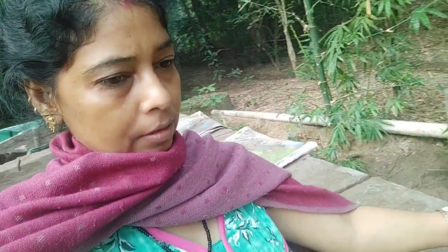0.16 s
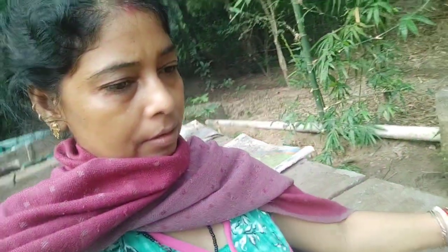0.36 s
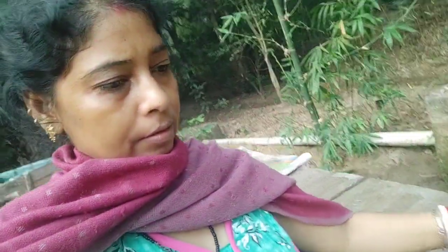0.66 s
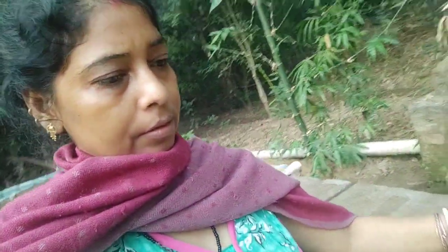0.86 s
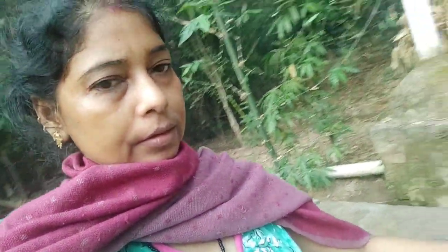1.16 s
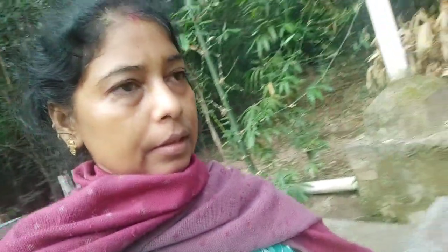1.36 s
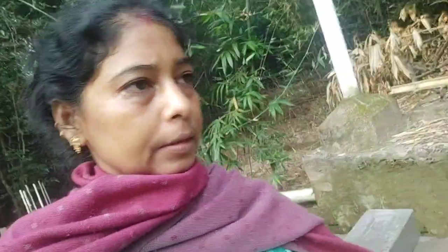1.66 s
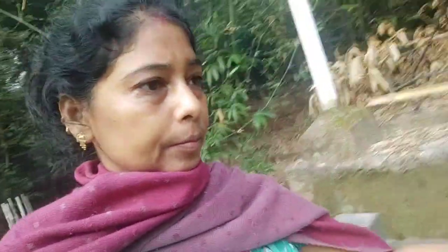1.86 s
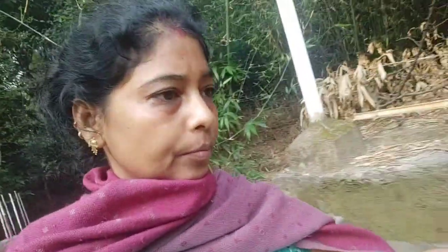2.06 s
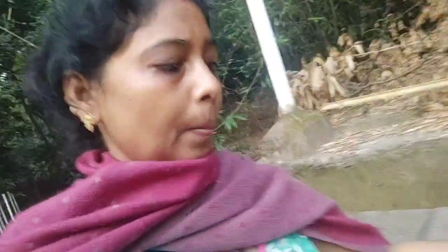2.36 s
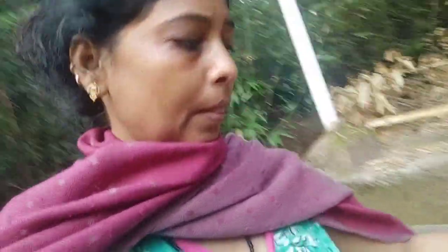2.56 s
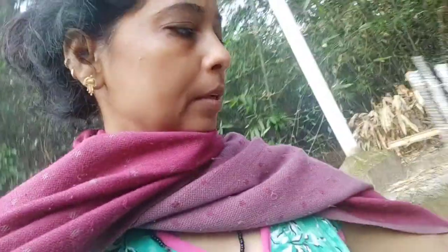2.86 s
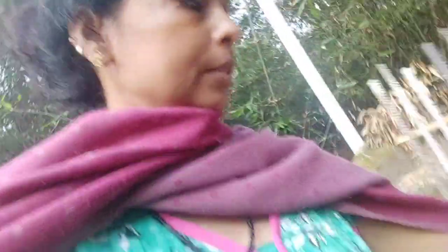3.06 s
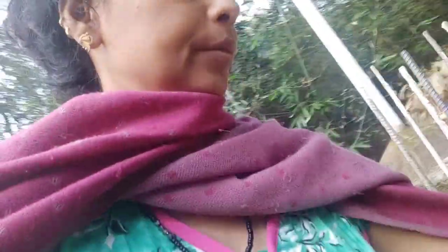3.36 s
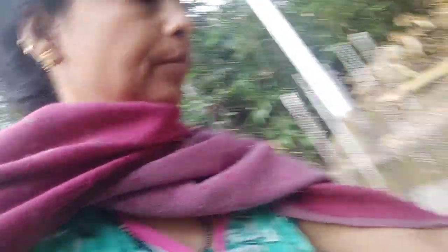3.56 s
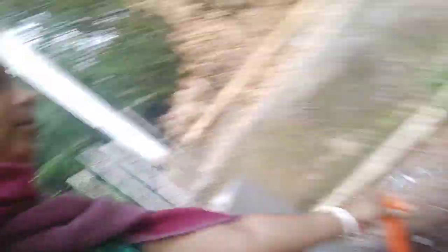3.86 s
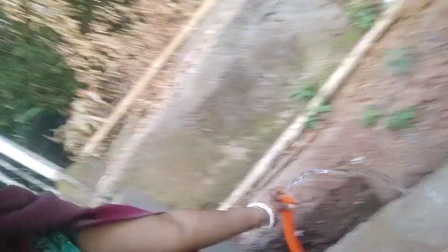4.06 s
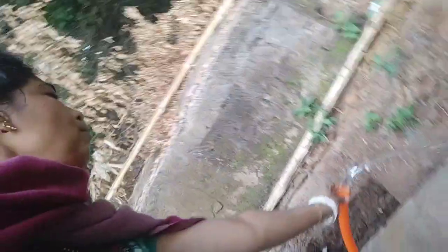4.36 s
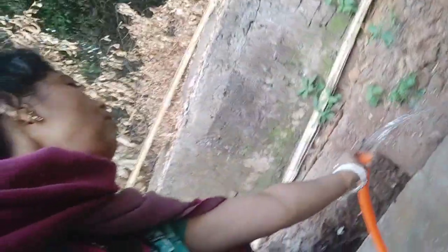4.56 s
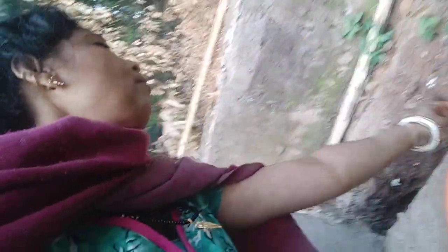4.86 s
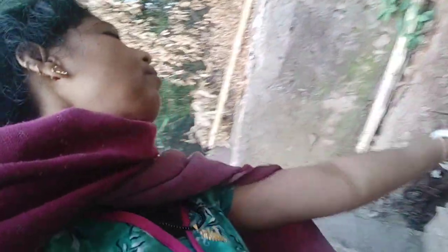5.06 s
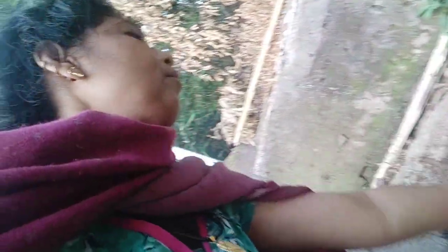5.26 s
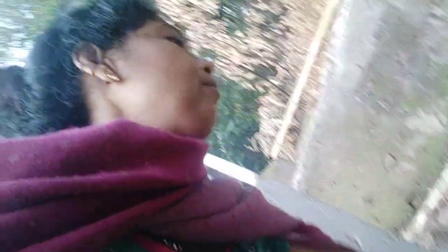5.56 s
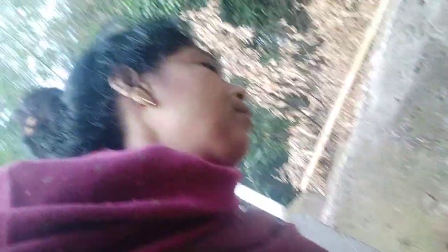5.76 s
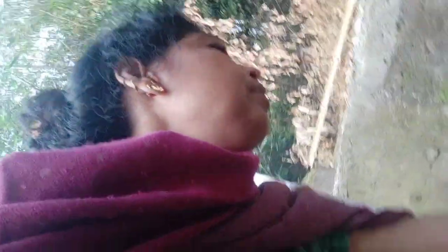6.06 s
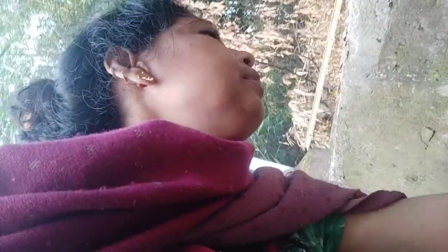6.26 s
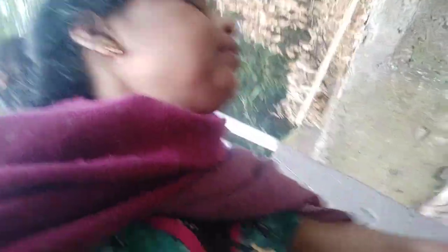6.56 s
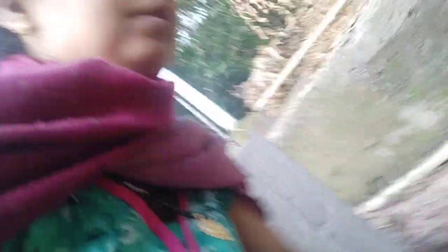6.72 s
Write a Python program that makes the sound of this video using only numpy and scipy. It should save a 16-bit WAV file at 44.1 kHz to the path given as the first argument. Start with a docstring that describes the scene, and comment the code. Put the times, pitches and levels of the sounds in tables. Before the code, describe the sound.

In an open yard, a hand-held hose spatters water close to a swinging phone. From 0 to 1.2 s the water is broken: a short hissing gush at 0.2, smaller spits, scattered plips and a sharp drop at 0.84, with tiny bangle ticks near 0.65 and 1.1. A stronger splash bursts at 1.4-1.6, more follow, and from 2 to 3 s a dense, bright, crackling spray peaks with large popping drops. It dips briefly at 3.1, then resumes as a smoother, fine sizzling hiss. Glass bangles jingle brightly at 4.1-4.3, with one wider clink at 5.3. The hiss weakens from 4.6, swells slightly near 5, and collapses after 5.5 into sparse, lower plops and drips, nearly gone by 6.9. Soft low bumps, distant rumble and faint wavering hum stay underneath; the left is hollower and slightly delayed.

```python
"""Water from a hand-held hose spatters on a wall and the ground in a yard, close to a phone that swings about.
Shaped noise gated by random impacts makes the hiss; decaying, rising sines make the drops' trapped bubbles.
Glass bangles clink on the wrist as damped modes; soft low bumps are brief damped sines.
A far rumble and rush of filtered noise and a faint wavering hum lie underneath.
The right microphone port faces the water; the left one hears it later, through a resonant duct."""
import sys
import numpy as np
from scipy import signal
from scipy.fft import rfft, irfft, next_fast_len
from scipy.io import wavfile
from scipy.ndimage import uniform_filter1d, map_coordinates

SR = 44100
rng = np.random.default_rng(int(sys.argv[2]) if len(sys.argv) > 2 else 0)


def generate_wav(sig):
    """Save sig (samples, or channels by samples) to the path in sys.argv[1] as 16-bit PCM at SR."""
    pcm = np.round(np.clip(np.atleast_2d(sig).T, -1, 1) * 32767).astype(np.int16)
    wavfile.write(sys.argv[1], SR, pcm)


N = 303849


def amp(db):
    """Decibel definition: amplitude ratio from level."""
    return 10 ** (np.asarray(db) / 20)


def unit(x):
    """RMS normalization: equal mean power for any signal."""
    return x / np.sqrt(np.mean(x ** 2) + 1e-20)


def along(points, hz):
    """Logarithmic interpolation: values between (frequency, value) points on a log-frequency axis."""
    f, v = np.transpose(points)
    return np.interp(np.log(hz + 1), np.log(f + 1), v)


def curves(rows):
    """Linear interpolation in time: one curve for each column after start_s."""
    s, *cols = np.transpose(rows)
    return [np.interp(np.arange(N) / SR, s, c) for c in cols]


def wobble(rate):
    """Slow random fluctuation: a spline through normal draws, rate knots a second."""
    knots = rng.standard_normal(int(N * rate / SR) + 4)
    return map_coordinates(knots, [np.arange(N) * rate / SR])


def filtered(x, response):
    """Linear filtering: the spectrum is multiplied by a complex response of frequency."""
    m = next_fast_len(N + 8192)
    return irfft(rfft(x, m) * response(np.fft.rfftfreq(m, 1 / SR)), m)[..., :N]


def add(pair, s, sound, pan_db):
    """Superposition: adds a sound to both channels at time s, with a left-right level difference."""
    at = round(s * SR)
    panned = amp([[pan_db / 2], [-pan_db / 2]]) * sound
    pair[:, at:at + sound.shape[-1]] += panned[:, :N - at]


# wavering hum tones: pitch_hz [Hz], level_db [dB]
HUM_TONES = [(205, -67.5), (310, -73.5)]
# noise spectra of the far rumble and of the rush: frequency_hz [Hz], relative density_db [dB per Hz]
RUMBLE_SPECTRUM = [(15, -0.5), (25, 4), (45, -1), (80, -7.5), (130, -41.5)]
RUSH_SPECTRUM = [(40, -18), (75, 4.5), (110, 0), (300, -4), (460, -7.5), (1000, -15), (2000, -23),
                 (4200, -15), (10000, -25.5), (16000, -16)]
# background level in time: start_s [s], rumble_db [dB], rush_db [dB]
YARD_LEVELS = [(0, -53, -55), (0.301, -51.5, -56.5), (2.65, -52, -52), (3.1, -51, -56), (5.4, -49.5, -57.5),
               (6.89, -50.5, -57.5)]
# correlation of the background at the two ports: frequency_hz [Hz], likeness [-1 to 1]
PORT_LIKENESS = [(30, 0.97), (130, 0.9), (300, 0.84), (640, 0.86), (1200, 0), (3000, 0)]


def yard():
    """Diffuse-field coherence: background noise is alike at both ports when low, unrelated when high."""
    t = np.arange(N) / SR
    out = 0
    for hz, db in HUM_TONES:
        phase = 2 * np.pi * hz * t
        out = out + amp(db + 3.1 * wobble(10)) * np.sin(phase + 0.29 * wobble(11.0))

    def mid_side(hz):
        # this angle makes the correlation of mid + side with mid - side equal the likeness
        angle = np.arccos(np.clip(along(PORT_LIKENESS, hz), -1, 1)) / 2
        return amp(along(spectrum, hz)) * np.array([np.cos(angle), np.sin(angle)])

    for spectrum, db in zip((RUMBLE_SPECTRUM, RUSH_SPECTRUM), curves(YARD_LEVELS)):
        mid, side = filtered(rng.standard_normal((2, N)), mid_side)
        out = out + amp(db + 0.7 * wobble(5)) * unit(np.array([mid + side, mid - side]))
    return out


# changing flow of the stream where it lands, with its longer swells: start_s [s], level_db [dB]
STREAM = [(0, -75), (0.4, -58.5), (1.07, -67), (1.1, -57), (1.25, -47), (1.32, -56), (1.93, -47.5),
          (2.1, -40.5), (2.28, -41.5), (2.52, -44.5), (2.62, -38.5), (3.03, -39.5), (3.1, -51.5),
          (3.26, -41.5), (3.5, -42), (4.66, -48), (4.9, -53), (4.94, -44), (5.43, -46.5), (5.55, -56),
          (5.7, -64.5), (6.3, -59), (6.89, -80)]
# separate gushes slopping out of the hose: start_s [s], length_s [s], level_db [dB]
GUSHES = [(0.188, .2, -39), (0.468, 0.051, -54.5), (0.648, 0.066, -52), (0.771, 0.012, -44.5),
          (0.844, 0.0042, -49.5), (1.018, 0.011, -54), (1.26, 0.01, -43.5), (1.376, 0.21, -32.5),
          (1.635, 0.046, -37.5), (1.688, 0.058, -35), (1.803, 0.025, -43.5), (1.885, 0.009, -39.5),
          (2.454, 0.025, -44), (2.974, 0.041, -34), (5.868, 0.045, -51.5), (6.029, 0.027, -52),
          (6.308, .005, -53.5), (6.36, 0.0069, -51), (6.423, .04, -61.5)]
# a gush swells, thins while it lasts, and breaks off
RISE_DB_PER_S, SAG_DB_PER_S, FALL_DB_PER_S = 800, 73, 552


def landing_db():
    """Power addition of independent sources: spray level of the changing stream plus every gush."""
    t = np.arange(N) / SR
    power = amp(curves(STREAM)[0]) ** 2
    for s, length, db in GUSHES:
        loss_db = RISE_DB_PER_S * np.clip(s - t, 0, None)
        loss_db += SAG_DB_PER_S * np.clip(t - s, 0, length)
        loss_db += FALL_DB_PER_S * np.clip(t - s - length, 0, None)
        power = power + amp(db - np.minimum(loss_db, 200)) ** 2
    return 10 * np.log10(power)


def impacts(per_s, spread_db, life_s):
    """Poisson-like arrivals: drops land at random, rise suddenly and decay; a few are far bigger."""
    lands = rng.random(N) < per_s / SR
    size_db = np.minimum(spread_db * rng.exponential(size=N), 4 * spread_db)
    return unit(signal.lfilter([1], [1, -np.exp(-1 / (life_s * SR))], lands * amp(size_db)))


# the band lifted at the left port has weaker companions higher up:
# multiple of the band centre [ratio], lift_db [dB]
UPPER_BANDS = [(1.52, 2.5), (2.02, 2)]


def patchy(x, centre_hz, lift_db, patchy_db):
    """Time-varying filtering: a wandering band is lifted at each port; random patches swell and sink."""
    hz, _, z = signal.stft(x, SR, nperseg=256)
    hz = hz[:, None] + 1
    centre = np.interp(np.linspace(0, N, z.shape[-1]), np.arange(N), centre_hz)
    lift = np.reshape(lift_db, (-1, 1, 1)) * np.exp(-(np.log(hz / centre) / 0.15) ** 2)
    for times, db in UPPER_BANDS:
        lift[0] += db * np.exp(-(np.log(hz / (times * centre)) / 0.067) ** 2)
    field = uniform_filter1d(rng.standard_normal(z.shape[1:]), size=6, axis=0)  # smooth in frequency
    field = uniform_filter1d(field, size=5, axis=1)  # smooth in time
    return signal.istft(z * amp(lift + patchy_db * unit(field)), SR, nperseg=256)[1][:, :N]


# hiss spectra of three drop sizes: frequency_hz [Hz], relative density_db [dB per Hz]
COARSE_SPECTRUM = [(150, -62), (350, -26), (700, -8.5), (1300, -12.5), (2200, -9), (3200, 3.5), (4500, -22),
                   (8000, -26.5)]
SPRAY_SPECTRUM = [(500, -70), (1500, -37), (3000, -6.5), (5000, 8.5), (8000, 3.5), (10500, -2), (13000, -6),
                  (16000, 5.5)]
MIST_SPECTRUM = [(2500, -70), (6000, -18), (9000, 2), (11500, 1.5), (13500, -2.5), (16500, -4.5)]
# what the water lands on: start_s [s], relative coarse_db [dB], relative mist_db [dB],
# centre_hz of the lifted band [Hz], spatter [0 smooth to 1 single impacts]
SURFACE = [(0, -14, -9.5, 4850, 0.71), (0.9, -8.5, -2.5, 4700, 1), (1.15, -8, -1, 4700, 0.47),
           (1.35, -11, -4.5, 7050, 0.5), (1.95, -11, -3, 6600, 0.33), (2.35, -12, -1.5, 6350, 0.87),
           (2.95, -11, -5, 6700, 0.76), (3.1, -16.5, -1.5, 7440, 0.42), (3.6, -17.5, -3, 7000, 0.13),
           (3.9, -15, -3, 9200, 0.07), (4.3, -15, -3.5, 5800, 0.4), (4.6, -14, -11, 4730, 0.48),
           (5.0, -12.5, -14.5, 5300, 0.06), (5.5, -8, -22, 4800, 0.3), (5.7, 7, -12, 4900, 0.94),
           (6.3, -3, -16, 5030, 1), (6.89, -2, -1, 4800, 0.94)]


def jet():
    """Impact-modulated noise: three drop sizes hiss; spatter turns a smooth rush into single impacts."""
    spray_db = landing_db()
    coarse_db, mist_db, centre_hz, spatter = curves(SURFACE)
    spatter = np.clip(spatter, 0, 1)
    slugs = impacts(280, spread_db=4.5, life_s=0.001)  # the broken stream lands in slugs that hold every size
    surge_db = 0.49 * wobble(30)
    # spectrum, level [dB over spray], share of noise power common to both ports
    layers = [(COARSE_SPECTRUM, coarse_db + 0.41, 0.75),
              (SPRAY_SPECTRUM, -1.5, 0.35),
              (MIST_SPECTRUM, mist_db + 3.5, 0.1)]
    out = np.zeros((2, N))
    for spectrum, db, alike in layers:
        drops = 1.5 * slugs + 0.22 * impacts(400, spread_db=4.5, life_s=0.0016)
        shared, *own = rng.standard_normal((3, N))
        noise = np.sqrt(alike) * shared + np.sqrt(1 - alike) * np.array(own)
        hiss = unit(filtered(noise, lambda hz: amp(along(spectrum, hz))))
        gate = np.sqrt(1 - spatter + spatter * unit(drops) ** 2)
        out += amp(spray_db + db + surge_db + 1.23 * wobble(40)) * gate * hiss
    return patchy(out, centre_hz, lift_db=[5, 3], patchy_db=2.5)


def plips(count):
    """Bubble resonance: small drops ring a cycle or two, lower and louder in coarse, spattering water."""
    spray_db = landing_db()
    coarse_db, _, _, spatter = curves(SURFACE)
    when, size = rng.random(count), rng.exponential(size=count)
    length = 300  # samples
    at = (when * (N - length)).astype(int)
    hz = 2600 * amp(-0.45 * coarse_db[at] + 3.4 * rng.standard_normal(count))
    hz = np.clip(hz, 900, 13000)[:, None]
    t = np.arange(length) / SR
    ring = np.sin(2 * np.pi * hz * t * (1 + 15 * t)) * np.exp(-t * hz / 2.5)  # rising pitch
    level_db = spray_db[at] + 0.84 * coarse_db[at] + 4.0 + 2.77 * size
    ring *= (np.clip(spatter[at], 0, 1) * amp(level_db))[:, None]
    out = np.bincount((at[:, None] + np.arange(length)).ravel(), ring.ravel(), N)
    return filtered(out, lambda f: (1j * f / (600 + 1j * f)) ** 2)  # low cut


# the biggest drops: start_s [s], relative level_db [dB], starting pitch_hz [Hz], relative fizz_db [dB]
BIG_DROPS = [(0.034, -27, 4670, -10), (0.237, -23, 4400, -7), (0.3448, -25.5, 7370, -2),
             (0.388, -15.5, 5130, -33), (0.4264, -20.5, 12800, -7.5), (0.4566, -25.5, 4600, -5),
             (0.512, -31, 5200, -19), (0.588, -29, 8000, -4), (0.7128, -28.5, 5900, -6),
             (0.7895, -28, 8700, -14), (0.8439, -9.5, 4760, -10.5), (0.853, -24, 7800, -7),
             (0.9026, -37, 2400, 1), (0.9335, -35, 10300, 4), (0.9817, -33, 8790, -2),
             (1.0257, -24.5, 7400, -18), (1.2647, -18, 3080, -1), (1.3433, -25, 8350, 7),
             (1.3498, -18.5, 7050, 1), (1.3836, -24, 11840, -1), (1.4697, -28, 7670, 4),
             (1.478, -16.5, 8950, 4), (1.539, -24, 10380, 5), (1.778, -22, 11800, 0),
             (1.809, -12.5, 7060, -3), (1.8924, -18, 8900, 6.5), (2.1027, -24, 6720, 15),
             (2.134, -23, 3540, 10), (2.1515, -13.5, 2630, -1), (2.1654, -14.5, 2700, -13),
             (2.1745, -14, 12020, 2), (2.2051, -20, 8200, 4), (2.2184, -18, 2590, 5.5),
             (2.2276, -25, 2500, 7), (2.363, -7, 5050, -6.5), (2.5403, -14.5, 8830, -1.5),
             (2.587, -8.5, 3710, -2), (2.591, -12, 4230, -3), (2.613, -26.5, 4260, 3),
             (2.6807, 4.5, 11000, -19.5), (2.736, -14.5, 6860, -7), (2.7674, -18.5, 3580, 8),
             (2.832, -8, 7040, -5), (2.8501, -13, 2940, -1), (2.8687, -4.5, 9750, -10),
             (2.8786, -17, 2680, 1), (2.897, -8, 9700, -1.5), (2.9318, -6.5, 7340, -8),
             (2.9555, -8, 7100, -14), (2.962, -10, 10100, 2), (2.9964, -20.5, 5400, 8),
             (3.0008, -13, 7620, -1), (3.261, -10.5, 8790, -9), (3.3114, -13.5, 6300, -9),
             (3.345, -9.5, 7900, -19), (3.5518, -16, 10400, 5.5), (3.8754, -19.5, 11200, 1.5),
             (5.3782, -21.5, 10400, 3), (5.4435, -11, 4950, -15), (5.6643, -22.5, 4900, -10),
             (5.732, -33, 1840, -13), (5.8197, -33.5, 2250, -14), (5.8677, -29, 3100, -14),
             (5.8894, -31, 2600, -12), (5.9067, -32, 1790, -16), (5.972, -38, 1800, -6),
             (6.0091, -37, 2110, -16), (6.0341, -14, 4920, -17), (6.0388, -23, 4140, -14),
             (6.081, -42, 2500, -4), (6.0972, -36, 2180, 4), (6.138, -28, 10980, -9),
             (6.1662, -24, 1810, -10.5), (6.1876, -31, 2400, -9), (6.274, -31.5, 4740, -22),
             (6.3158, -34, 2400, 6), (6.3327, -33, 3200, -15), (6.3556, -36, 3920, -20),
             (6.3655, -23, 3100, -4)]


def splats():
    """Bubble resonance and sheet breakup: a big drop rings a few cycles, slaps, and throws off a fizz."""
    out, t = np.zeros((2, N)), np.arange(SR // 60) / SR
    for s, db, hz, fizz_db in BIG_DROPS:
        shared, left, right, lean = rng.standard_normal((4, len(t)))
        noise = 0.33 * shared + 0.46 * np.array([left, right])
        # the trapped bubble rises in pitch
        ring = 0.82 * np.sin(2 * np.pi * hz * t * (1 + 15 * t)) * np.exp(-t * hz / 4.8)
        ring *= 1 - np.exp(-t / 0.0000667)
        spread = (1 - np.exp(-t / 0.00071)) * np.exp(-t / 0.0014)  # the sheet of water spreads, then settles
        slap = 0.24 * noise
        fizz = amp(fizz_db + 8.5) * np.diff(noise[:, ::-1], prepend=0)  # differencing brightens the noise
        add(out, s, amp(db - 4.5) * (ring + spread * (slap + fizz)), pan_db=0.63 * lean[0])
    # drops move little low air; the top is softened too
    return filtered(out, lambda hz: (1j * hz / (450 + 1j * hz)) ** 2 / (1 + 1j * hz / 14000))


# soft low bumps: start_s [s], relative level_db [dB], pitch_hz [Hz]
BUMPS = [(0.44, -46, 152), (0.839, -45.5, 78), (1.52, -43, 115), (1.81, -48.5, 104), (2.537, -43.5, 80),
         (3.329, -45, 63), (5.604, -54, 350), (3.795, -48, 142), (3.866, -41, 86.5), (6.793, -41, 78),
         (6.851, -43, 59.3)]


def thumps():
    """Heavily damped oscillation: soft low bumps that die away quickly, stronger on the left."""
    out, t = np.zeros((2, N)), np.arange(SR // 8) / SR
    envelope = np.exp(-t / 0.018) * (1 - np.exp(-t / 0.004))
    for s, db, hz in BUMPS:
        add(out, s, amp(db + 3) * np.sin(2 * np.pi * hz * t) * envelope, pan_db=8)
    return out


# bangle clinks: start_s [s], level_db of each of three ring modes in turn [dB], tick_db [dB]
CLINKS = [(0.641, -45, -41, -63, -38), (0.659, -55, -61, -61, -40), (1.092, -45, -37.5, -35, -30),
          (1.116, -45, -58, -59, -33), (3.459, -34.5, -52, -54, -39), (4.073, -35, -43, -58, -27),
          (4.144, -38, -28, -19, -37), (4.167, -21, -51, -29, -29), (4.1771, -43, -55, -55, -22),
          (4.2282, -31, -29.5, -40, -14), (4.238, -34, -33, -60, -18.5), (4.25, -44, -52, -58, -31),
          (4.269, -50, -48, -62, -40)]
# ring modes, each a close pair that beats: pitch_hz [Hz], split_hz [Hz], t60_s [s]
BANGLE_MODES = [(8325, 35, 0.095), (11990, 58, 0.088), (15670, 55, 0.12)]
# further modes that follow the first pair: pitch_hz [Hz], level_db relative to it [dB], t60_s [s]
FAINT_MODES = [(2955, -27, 0.14), (6170, -21.5, 0.13)]
# a wider bangle is struck: start_s [s], level_db [dB]
WIDE_CLINKS = [(5.3197, -22)]
# its modes: pitch_hz [Hz], relative level_db [dB], t60_s [s]
WIDE_MODES = [(2790, -31.5, 0.17), (7740, -12.5, 0.1), (7800, -26, .1), (10900, -10.5, 0.094),
              (14750, -10, 0.061)]


def bangles():
    """Modal vibration: struck glass rings give a bright tick, then thin decaying lines, some beating."""
    out, t = np.zeros((2, N)), np.arange(SR // 4) / SR

    def tick():
        noise = uniform_filter1d(rng.standard_normal(len(t)), size=5)
        return noise * np.sin(2 * np.pi * 9600 * t) * np.exp(-t / 0.0018)

    def mode(hz, db, t60):
        return amp(db - 60 * t / t60) * np.sin(2 * np.pi * hz * t)

    for s, *levels, tick_db in CLINKS:
        ring = np.zeros(len(t))
        for db, (hz, split, t60) in zip(levels, BANGLE_MODES):
            ring += mode(hz, db, t60) - 0.26 * mode(hz + split, db, t60)
        for hz, db, t60 in FAINT_MODES:
            ring += mode(hz, levels[0] + db, t60)
        add(out, s, ring + amp(tick_db) * tick(), pan_db=-0.5)
    for s, db in WIDE_CLINKS:
        ring = sum(mode(*row) for row in WIDE_MODES)
        add(out, s, amp(db) * (ring + 1.4 * tick()), pan_db=7.0)
    return out


# the phone swings: start_s [s], left gain_db for the water [dB]
PHONE_SWING = [(0, 0.5), (2.6, 1.5), (3.1, -2), (4.2, -0.5), (6.89, -2.5)]
LAG_S = 0.0004825  # delay of the extra path to the left port


def scene():
    """Interaural-style level and time differences: near sounds reach the left port later."""
    background = yard()
    water = jet() + plips(count=900) + splats()
    water[0] *= amp(curves(PHONE_SWING)[0])
    bumps = thumps()
    near = water + bangles()
    near[0] = filtered(near[0], lambda hz: np.exp(-2j * np.pi * hz * LAG_S))
    return near + background + bumps


# left port resonances: centre_hz [Hz], width_hz [Hz], gain_db at the centre, negative for a dip [dB]
DUCT_RESONANCES = [(2795, 457, 14), (4970, 840, 5.5), (6770, 1340, 8), (9700, 2300, 2.5),
                   (12800, 1900, -4.5)]


def left_duct(hz):
    """Duct resonance: second-order peaks, and one dip, in cascade colour the left port."""
    response = 1
    for centre, width, db in DUCT_RESONANCES:
        stiff, loss = centre * centre - hz * hz, 1j * hz * width
        response = response * (stiff + loss * amp(db)) / (stiff + loss)
    return response


TOP_HZ = 15760  # start of the steep upper cutoff


def record(dry):
    """Band limitation: the duct colours the left channel, then both lose everything far above TOP_HZ."""
    wet = np.array([filtered(dry[0], left_duct), dry[1]])
    return filtered(wet, lambda hz: amp(-np.clip(hz - TOP_HZ, 0, 2000) / 8))  # 1 dB per 8 Hz


dry = scene()
out = record(dry)
generate_wav(out)
```